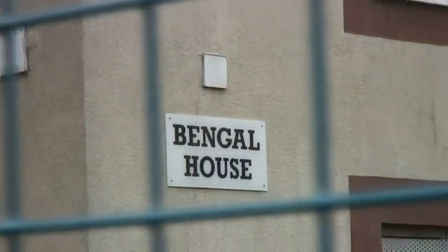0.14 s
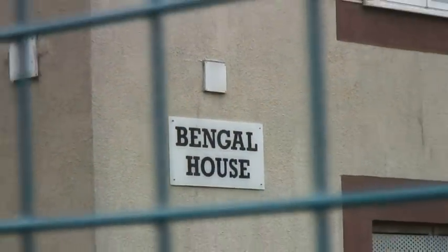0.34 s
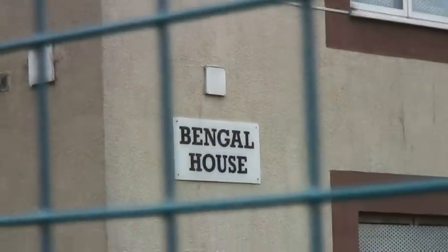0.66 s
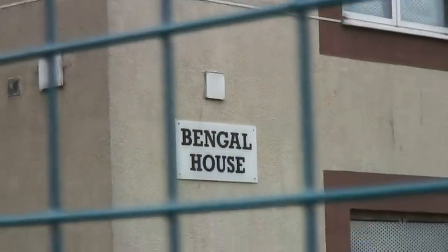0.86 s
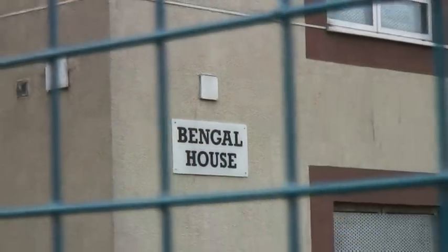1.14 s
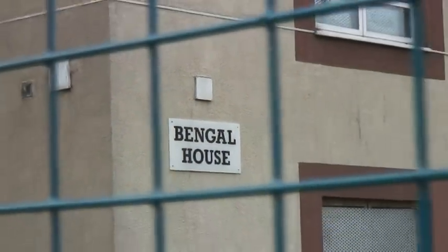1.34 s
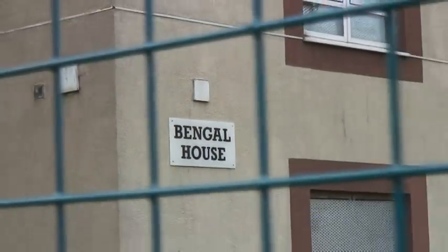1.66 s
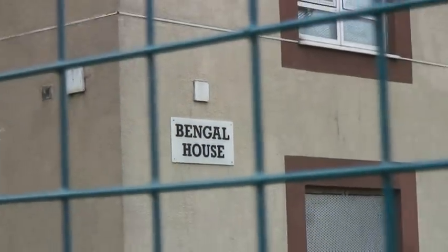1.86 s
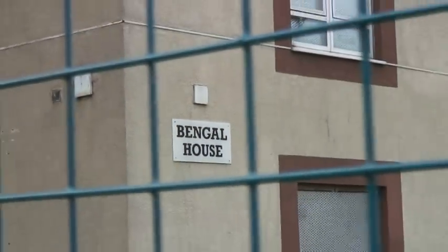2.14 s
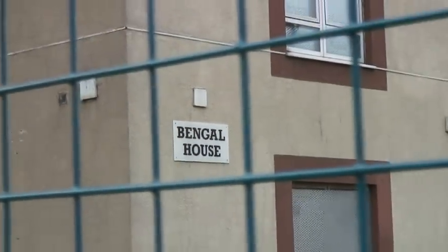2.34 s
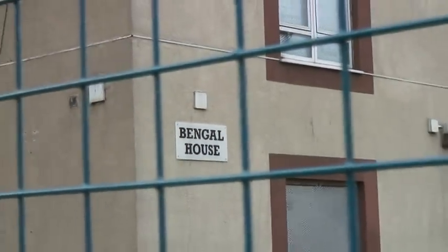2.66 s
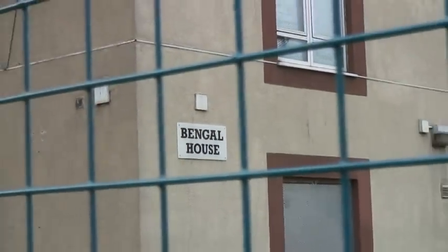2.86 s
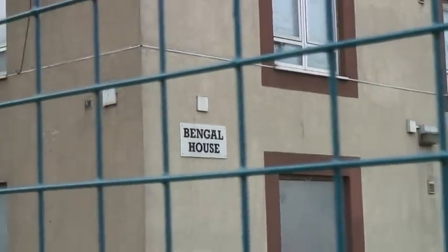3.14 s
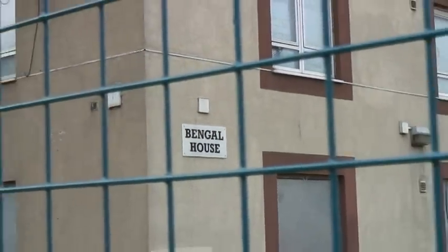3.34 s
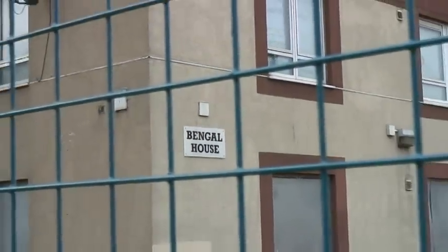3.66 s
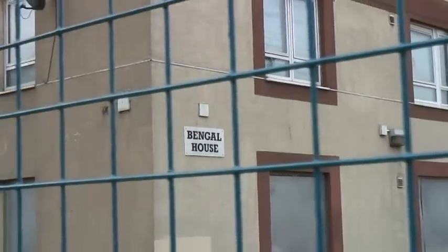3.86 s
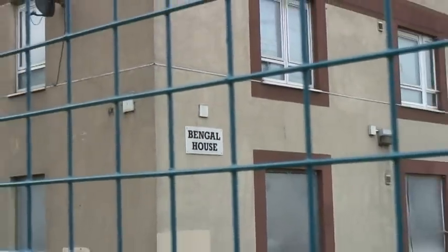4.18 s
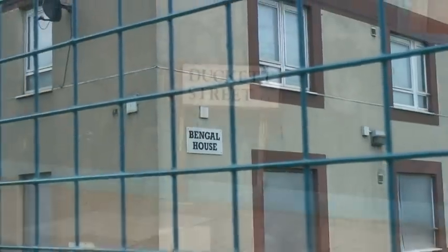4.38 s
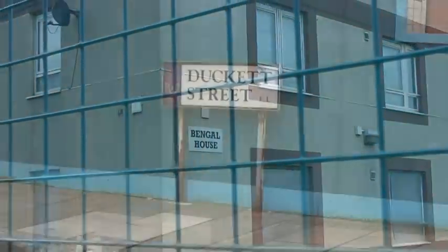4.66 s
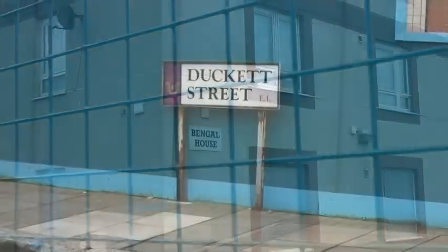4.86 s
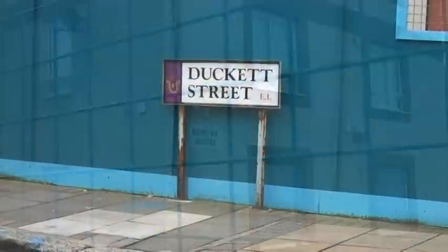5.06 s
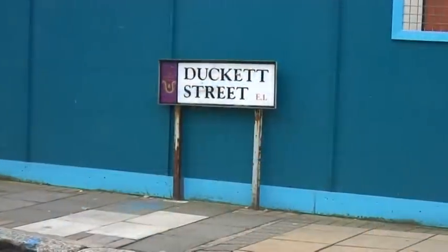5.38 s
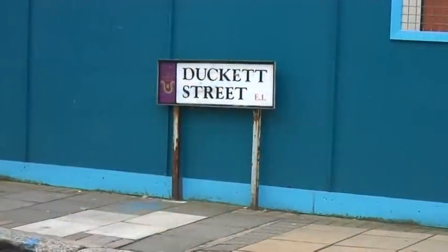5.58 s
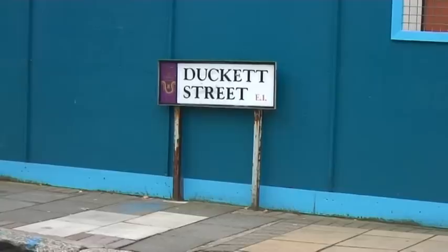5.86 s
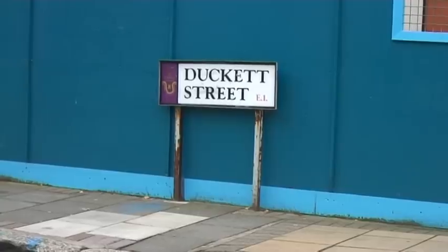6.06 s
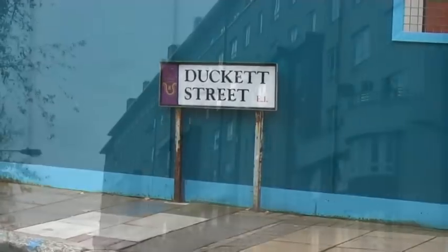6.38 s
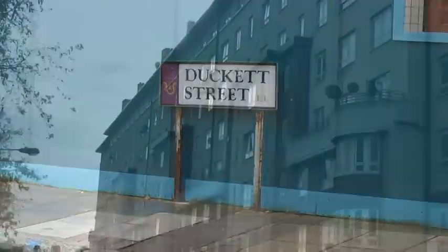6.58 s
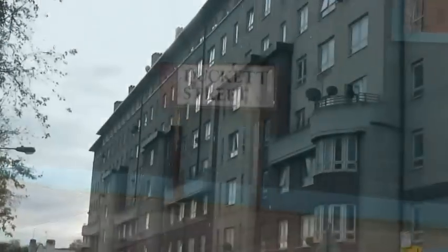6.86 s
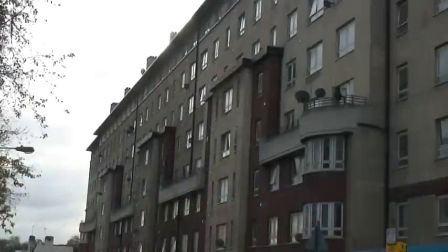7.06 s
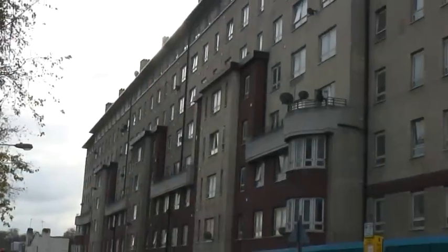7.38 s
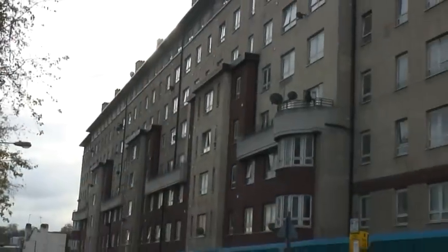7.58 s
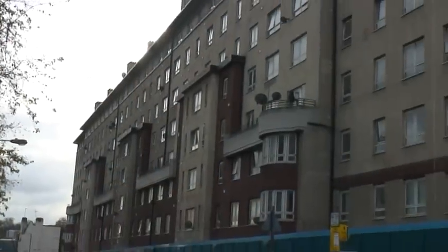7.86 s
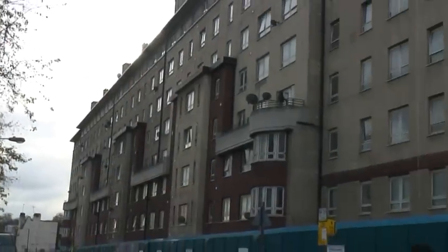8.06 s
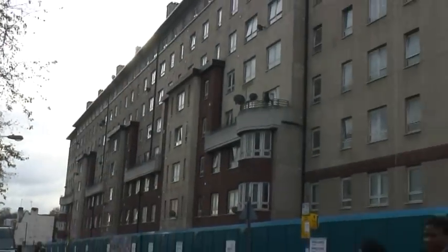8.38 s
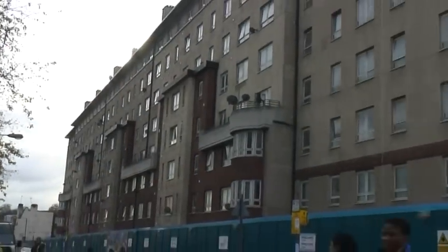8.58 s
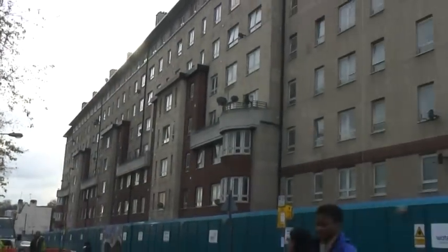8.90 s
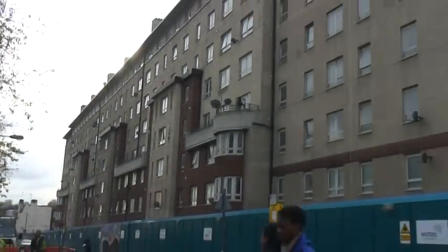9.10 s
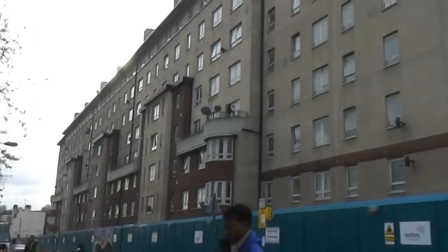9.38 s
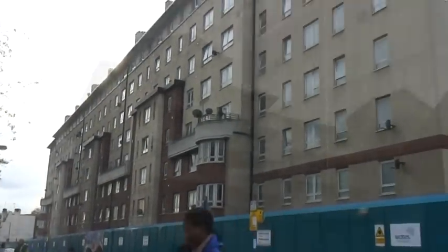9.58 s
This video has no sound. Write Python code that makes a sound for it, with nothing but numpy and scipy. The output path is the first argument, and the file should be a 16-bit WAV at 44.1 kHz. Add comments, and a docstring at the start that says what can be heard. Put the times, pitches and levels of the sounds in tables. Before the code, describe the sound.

From the start, a pneumatic breaker hammers concrete at about twenty blows a second, loud and bright, each blow mixing a low exhaust puff, dry clatter, tiny chip pings and a brief steel chisel ring. Around 1.4-1.6 s the rhythm drags slightly, then recovers. From about 2.4 s the blows weaken into hollow knocks with a rough metallic ring, ending near 2.8 s. A low diesel drone, town rumble and faint hiss remain, with two very faint taps near 3.4 s. Hammering returns at 3.6 s, a little slower. Around 4.6 s it crossfades to a softer, more echoing position, steady until about 6.7 s. A third position fades in, slower at roughly sixteen blows a second, stopping at 7.3 s. After nearly a second of drone, it restarts at 8.2 s and continues to the cut at about 9.7 s. House fronts echo throughout; the sound is distant and almost mono.

```python
"""A demolition site: a pneumatic breaker hammers in bursts, heard from three spots in the street in turn,
one fading into the next. Each blow puffs exhaust air (a short tone), clatters (shaped noise), throws chips
(pings) and rings the steel chisel (dying sines); some blows land in empty air and knock the tool holder.
House fronts echo it all. Behind it a diesel compressor drones (wavering sines) over town rumble and far air
hiss (filtered noise). The microphone is nearly mono."""
import sys
import numpy as np
from scipy import signal
from scipy.fft import rfft, irfft, next_fast_len
from scipy.io import wavfile
from scipy.ndimage import uniform_filter1d, map_coordinates

SR = 44100
rng = np.random.default_rng(int(sys.argv[2]) if len(sys.argv) > 2 else 0)


def bounce(signal):
    """Save signal as a 16-bit WAV file at the path given by the first command-line argument."""
    frames = np.transpose(np.atleast_2d(signal))
    limited = np.clip(frames, -1, 1)
    pcm = np.round(limited * 32767).astype(np.int16)
    wavfile.write(sys.argv[1], SR, pcm)


N = 429534
LEAD = 256  # samples of room ahead of each blow


def amp(db):
    """Turn decibels into a plain factor."""
    return 10 ** (np.asarray(db) / 20)


def unit(x):
    """Scale each row to an RMS of 1."""
    return x / np.sqrt(np.mean(x ** 2, axis=-1, keepdims=True) + 1e-20)


def along(points, hz):
    """Read a curve of (f/Hz, value) points on a log frequency axis."""
    f, v = np.transpose(points)
    return np.interp(np.log(hz + 1), np.log(f + 1), v)


def wobble(rate):
    """A smooth random curve over the whole scene, rate knots a second."""
    knots = rng.standard_normal(int(N * rate / SR) + 4)
    return map_coordinates(knots, [np.arange(N) * rate / SR])


def jolts(count, t, rate):
    """One smooth random curve per blow, rate knots per unit of t (seconds, or Hz for a spectrum)."""
    knots = rng.standard_normal((count, int(t[-1] * rate) + 2))
    k, part = np.divmod(t * rate, 1)
    k = k.astype(int)
    ease = (1 - np.cos(np.pi * part)) / 2
    return knots[:, k] * (1 - ease) + knots[:, k + 1] * ease


def filtered(x, response):
    """Multiply the spectrum of x by a response of frequency, which may be complex."""
    n = x.shape[-1]
    m = next_fast_len(n + 8192)
    return irfft(rfft(x, m) * response(np.fft.rfftfreq(m, 1 / SR)), m)[..., :n]


def laid(rows, at):
    """Add rows of sound at their sample positions, taking off the lead."""
    return np.bincount(at.ravel(), rows.ravel(), N + SR)[LEAD:N + LEAD]


def breaker():
    """The blows reach each spot by a few wall paths, each with its own delay and dulling, and a diffuse tail."""
    # blows, one list per listening spot; levels before fixed trims: t/s, exhaust level/dB, clatter level/dB,
    # ring of the two lowest chisel groups over the clatter/dB, second group over the first/dB,
    # extra ring of the high groups/dB
    blow_lists = [
        [(0.0147, -18.5, -26, 13.5, -1, 4), (0.0661, -14.5, -26, 17.5, 5, 7.5),
         (0.1177, -16.5, -25, 3, -11, -1), (0.168, -15.5, -24, 8, -1, 6), (0.219, -19.5, -24, 3, 11, -3),
         (0.27, -15.5, -27, 9, -6, 10.5), (0.3198, -32, -22, -5, 10, -1.0),
         (0.3703, -14.5, -26.5, 16.5, 4, 13.5), (0.4226, -15.5, -25.5, 5.0, -3, 5),
         (0.4751, -15, -25.5, 7, 7.0, 4.0), (0.5262, -15.5, -23.5, 7.5, 1.0, 6.0),
         (0.5764, -15, -28, 13, -3, 12.5), (0.6259, -15, -25.0, 2, 0.0, 6.5), (0.676, -18, -24, 6, 0.0, 8),
         (0.7255, -17, -26.0, 6.5, -12, 0), (0.7757, -14.5, -24.5, 4.5, 9, 4.0),
         (0.8254, -14.5, -25, 0, -14, -2), (0.8758, -14.0, -28.5, 3, -8, 3), (0.9271, -14.5, -25.5, 3, -4, 3),
         (0.9784, -14.5, -27.5, 5.5, 3.0, 5), (1.029, -16, -25.5, 2, 0.0, -4.0),
         (1.0809, -15.5, -26.5, 0, -5.0, 4), (1.132, -13.5, -26, 7, 10, -4.0),
         (1.1817, -15.5, -23.5, 1, -11, -11.0), (1.2322, -13, -27, 3, -8, -8), (1.2819, -14, -24, 3, -13, 1),
         (1.3332, -14, -25.0, 7.0, -7, 0), (1.3884, -14.5, -27.5, 10, 0, 4),
         (1.4489, -17.5, -27.5, -2.0, -10, -18), (1.5127, -17.5, -28.5, -6, -9, -15),
         (1.577, -18, -29, 4, -13, -6), (1.6328, -15, -26, 6.0, -5, 4), (1.6835, -13.5, -25.5, 1, 13, -2.0),
         (1.7339, -13, -26, 1, 10, 3.5), (1.7841, -15, -24, 5, 8.0, 4), (1.8353, -13.0, -24, -2, 13.0, -3),
         (1.8844, -16, -27, 8.5, -10, 3), (1.9348, -13.5, -24.5, 13.5, 0, -1),
         (1.9849, -13, -25.5, 10.5, -8, 3), (2.0358, -14.5, -25, 5, 17, -3), (2.085, -25, -26, -1, 6, 3),
         (2.1373, -15, -25.5, 8.5, -2, 9), (2.189, -28.5, -23.5, 7, 0, -4), (2.2414, -21, -27.5, 11.5, 2, -8),
         (2.2932, -17, -27.5, 6, 3, -4.0), (2.3448, -21, -27.5, 9, 14, 2.5), (2.398, -21, -35, 3, 0.0, 4),
         (2.45, -23, -32.5, -8, 4.0, -3), (2.503, -21, -33, -2, 10.0, -5), (2.5527, -25, -33, -3, 9, -2),
         (2.6064, -24, -32, -3, 2.0, 2), (2.66, -35, -34, 6, -3, 8), (2.759, -43, -54, 3, 1, 0.0),
         (2.814, -45, -48.5, -6, 0, -3), (3.36, -33, -60, 10, -25, -3), (3.413, -33, -59, 9, -24, -2),
         (3.635, -27, -30, 5, -7, -2), (3.6901, -17, -28.5, 8.5, 6, -2.0), (3.7425, -20.5, -28.5, 5, 3, -4),
         (3.7933, -15.5, -29, -2, -5, -2), (3.8446, -14.5, -26, 16.0, -1.5, -0.0),
         (3.8978, -13.5, -24.5, 4, -2, 2), (3.9516, -14, -24.5, 6, 13, 2.5), (4.0053, -14.5, -26.5, 18, 2, 2.0),
         (4.0583, -15, -26, 4, 2, 1.0), (4.1126, -15, -26.5, 11, 2.0, 0), (4.1697, -14.5, -28, 10.5, -6, -0.0),
         (4.2233, -16.5, -26, 6, 0.0, 3), (4.277, -14, -27.5, 4.0, -2, 1.0),
         (4.3306, -14.5, -22.5, 5.5, -5, -8), (4.3864, -18, -28, 9, 2, 7.5), (4.4418, -18, -27.5, 8.5, 5.0, 0),
         (4.4974, -19.5, -27.5, 4, -2, -4.0), (4.5531, -20, -26.5, 7, 3, 2.5),
         (4.6101, -19, -27.5, 10, -1, -1.0), (4.6696, -23, -30, 5.0, 5.0, -3)],
        [(4.661, -32, -36, -4, 4, -6), (4.7121, -22, -31, -1.0, 13, -5), (4.7625, -28, -28, 7.5, 0.5, -5),
         (4.8142, -24.0, -30.5, 3, 1, -2), (4.8641, -19.5, -30, 7, 4, 4), (4.9144, -26, -26, 1, -1, 5),
         (4.9661, -21.0, -29.0, 11, -5, -1), (5.016, -21.5, -28, 4, 11, -5), (5.0664, -23, -26.0, 1, -1, 3),
         (5.1172, -21.5, -26, -3, 11, 1), (5.1682, -21, -27, 6, -5, 3.0), (5.2186, -19.5, -24, 8.5, 3, 1),
         (5.2691, -19.5, -25.5, 2.5, -11, -2), (5.3202, -19.5, -24, 6.5, -3, 3),
         (5.3708, -18.5, -25, 11.5, 2, 5), (5.4213, -19, -25, 8, 2.5, -3), (5.4722, -21, -25.5, 5.0, -5, -3),
         (5.5231, -18.5, -26, 7, -4.0, -13), (5.5741, -22, -25, 8.5, -1, 5), (5.6248, -21, -27.5, 10.5, 2, 2),
         (5.6751, -21, -27.5, 12.5, 8.5, 1), (5.7261, -22.5, -25.5, 7.0, -14, -3),
         (5.776, -20, -26.5, 13, 6.5, 7), (5.8266, -22.5, -25, 8.0, 3, 1),
         (5.8767, -20.5, -26.5, 8.5, 12.0, -2), (5.9273, -20, -24.5, 8.0, -2, -2.0),
         (5.9786, -18.5, -25, 14, 1, 4.0), (6.0293, -19.5, -26, 9, 10, 1), (6.0802, -18.0, -28, 15.5, 7, 8),
         (6.1306, -20.5, -25, 5, -3.0, 3), (6.1814, -20.0, -27.5, 12.5, 6, 4.0), (6.232, -22, -25, 10, 0, 6.0),
         (6.2827, -22.5, -26.0, 8, 7.0, -1), (6.3331, -22.0, -28, 8.5, 17, 1), (6.3835, -21, -26.0, 1, 9, -5),
         (6.4349, -24, -30.5, 8.0, 12, -0.0), (6.4851, -24.5, -29.0, 7, 5, -1.0),
         (6.5356, -24, -30.5, 10.5, 4, -1.0), (6.5854, -25.0, -29.5, 0.5, 9, 1), (6.6363, -32, -30, 6.5, 9, 3),
         (6.6866, -25.0, -32, 4.0, 8, -2.0), (6.7379, -28, -34, 9, 5.0, -4), (6.791, -32, -40, 14, 2, 6.0)],
        [(6.698, -33, -29.5, -1.0, 7.0, -1), (6.7601, -28, -27, 4.5, 12, 1.0),
         (6.8179, -25.5, -28.5, 5, 3.0, -4.0), (6.8732, -27, -25.0, -1, -5.0, 0),
         (6.9307, -24, -27.5, -4, -2.0, -7), (6.9852, -23, -26, -1.0, -4.0, 3),
         (7.0459, -20, -26.5, 0, -3.0, -6), (7.1015, -23, -23.0, 9.5, -3, 0), (7.1628, -20, -26, 7, -12, 3.0),
         (7.2271, -18.5, -25, -4, -2.0, -11), (7.3049, -27, -28.5, -11, -2.0, -9),
         (8.2361, -23, -27.5, 4, -11, -6), (8.302, -18.5, -27, 12, -12, 1), (8.3584, -21.5, -27.5, 12, 0, 5.5),
         (8.4243, -21, -28.0, 10, -19, -5), (8.4954, -21, -27.5, -2.0, 8, -3),
         (8.5586, -20.0, -26.5, 5, -13, -4.0), (8.6146, -18, -28, -3, 4, 4), (8.6764, -18.5, -27.5, 4, -6.0, 9),
         (8.7393, -20.5, -27, 6, 0, -1.0), (8.8004, -18.5, -27.5, 15, -2.0, 10),
         (8.8617, -19.5, -28.5, -3.0, -1.0, 3), (8.9206, -20, -28.5, 12, -6, 6), (8.9814, -22, -26, 6, -1, -2),
         (9.0433, -19.5, -27.5, -10, -2.0, 3), (9.1007, -17, -26, 2, -5, -1), (9.1648, -23, -27, 6, -17, -1),
         (9.2235, -18, -27.0, 0.0, -1, 5.0), (9.2873, -16.5, -29, 10, -6.0, 3),
         (9.344, -20, -24.5, -5, -9.0, -1), (9.4066, -21, -28.5, 0, -1, 4), (9.4628, -19, -25.0, 12, -3, 4),
         (9.5259, -20, -26.5, 7, -7, 2.0), (9.5832, -19.5, -27.5, 10, 1, 6), (9.6461, -21, -26.5, 1.0, 12, -3),
         (9.705, -22.0, -27.0, 17, -3, 10)],
    ]
    # exhaust puff at each spot: f/Hz, lag/s, length/s, phase/turns
    puffs = [(328, 0.0043, 0.0019, 0.016), (401, 0.002, 0.0019, 0.51), (376, 0.00081, 0.0013, 0.58)]
    # sound paths to each spot, and last to the first spot once the tool has moved:
    # delay/s, level/dB, dulled above f/Hz
    path_sets = [
        [(.0001, 0.3, 16700), (.007, -11, 9500), (.0215, -17.5, 6200)],
        [(.0001, 5, 3240), (.0124, 0.5, 13600), (.021, -5.5, 11800), (.034, -32, 5000)],
        [(.0001, 2.5, 15000), (.0145, 2.5, 8460), (.021, -29, 8350)],
        [(.0001, 0.9, 5400), (.0072, -6.5, 15700), (.016, -13, 12100), (.0215, -15.5, 6150)],
    ]
    # level/dB of the scattered echo for each set of paths
    tail_levels = [-9.5, -4, -5, -7.5]
    # what walls and fences let through to each spot: f/Hz, level/dB
    views = [
        [(90, -9), (200, -0.5), (278, 4), (350, 0), (430, -0.6), (600, -2.5), (930, 0.5), (1600, 0), (3500, -5),
         (9000, 3.5), (14000, -0.5)],
        [(60, -35), (115, -4), (170, -7), (255, 4.5), (400, -7.5), (600, 1.5), (770, 0), (1000, -2),
         (2200, -2.7), (3500, -0.56), (9000, 3.5), (14000, 2)],
        [(60, -33), (110, 4), (160, -31), (300, -1.5), (480, -1.5), (850, -1), (1500, -4), (2400, -5.5),
         (3700, -1), (5500, 0), (9700, 1.5), (14000, 1)],
    ]
    # a row for each spot, the moved tool and the empty blows: chips, then the five upper ring groups,
    # all as level/dB over the clatter, before trims
    balances = [(0, -12, -8.5, -15.5, -22.5, -5), (-8, -1.5, -1.5, -15.5, -31, -12),
                (0.5, 0, -6.5, -20, -15.5, -14.5), (-19, 2.5, 1, -9.5, -14.5, -1),
                (-4, 4, -1, -15, -13, -6)]
    # in the same order: a chisel wedged deep lifts the main note of its lowest group by f/Hz
    seat_shifts = [0, 0, 170, 0, 0]
    # first and last t/s of the time when the chisel is lifted and the piston knocks the tool holder
    empty_span = (2.38, 2.9)
    move_s = 3.5  # in the first pause the tool moves partly behind a corner
    sway_s = .0002  # the tool shifts, so each path is a little longer or shorter at every blow

    first = np.array(blow_lists[0])
    moved = first[:, 0] > move_s
    empty = (first[:, 0] > empty_span[0]) & (first[:, 0] < empty_span[1])
    knocks = holder(first[empty])
    out = knocks + amp(-9.5) * signal.fftconvolve(knocks, scatter())[:N]
    stages = [(first[~moved & ~empty], 0), (blow_lists[1], 1), (blow_lists[2], 2),
              (first[moved], 0), (first[empty], 0)]
    settings = zip(stages, path_sets + path_sets[:1], tail_levels + tail_levels[:1], balances, seat_shifts)
    for (table, spot), paths, tail_db, balance, seat_hz in settings:
        rows = blows(table, puffs[spot], balance, seat_hz)
        rows = filtered(rows, lambda f: amp(along(views[spot], f)))
        sway = sway_s * rng.standard_normal((len(table), len(paths)))

        def walls(f):
            total = 0
            for (delay, db, dull_hz), shift in zip(paths, sway.T):
                late = np.exp(-2j * np.pi * f * (delay + shift[:, None]))
                dulling = (1 + np.sqrt(2) * 1j * f / dull_hz - (f / dull_hz) ** 2) ** 2
                total = total + amp(db) * late / dulling
            return total

        starts = np.round(np.transpose(table)[0] * SR).astype(int)
        at = starts[:, None] + np.arange(rows.shape[1])
        out += laid(filtered(rows, walls), at)
        # moving air keeps the echo of one blow unlike the next: three tails take turns
        for k in range(3):
            out += amp(tail_db) * signal.fftconvolve(laid(rows[k::3], at[k::3]), scatter())[:N]
    return out


def blows(table, puff, balance, seat_hz):
    """One row of sound per blow, before the street shapes it: puff, clatter, chips and ring added up."""
    t = (np.arange(SR // 12) - LEAD) / SR
    u = np.clip(t, 0, None)  # time since the blow
    count = len(table)
    exhaust_db, clatter_db, chips_db, *ring_db = strengths(table, balance)
    sound = amp(exhaust_db + 8.5) * exhaust(t, puff)
    sound = sound + amp(clatter_db + 13) * clatter(count, u)
    sound += amp(chips_db + 3.5) * chips(count, t, size=7)
    sound += chisel_ring(count, u, ring_db, seat_hz)
    return sound * np.clip((t[-1] - t) / .03, 0, 1)  # fade out the end of each row


def strengths(table, balance):
    """All levels of each blow: exhaust, clatter, chips and the seven ring groups."""
    # how chips and the five upper ring groups follow the low ring (row 1) and the high ring (row 2), dB/dB
    follow = [(.4, .3, 0, 0, .1, 0), (0, .3, 1, 1, .3, 1)]
    # scatter of each of these from blow to blow, level/dB
    chance_db = (4, 3.5, 2.5, 3, 4, 2)
    _, exhaust_db, clatter_db, ring_db, lean_db, high_db = np.transpose(table)
    luck = chance_db * rng.standard_normal((len(table), len(balance)))
    followed = np.transpose([ring_db, high_db]) @ follow
    chips_db, *upper_db = (clatter_db[:, None] + balance + followed + luck).T
    low_db = clatter_db + ring_db
    levels = [exhaust_db, clatter_db, chips_db, low_db - lean_db / 2, low_db + lean_db / 2, *upper_db]
    return np.array(levels)[..., None]


def exhaust(t, puff):
    """A puff of exhaust air: a low tone that swells and dies in a few ms."""
    hz, lag, length, turns = puff
    u = t - lag
    return np.cos(2 * np.pi * (hz * u + turns)) * np.exp(-(u / length) ** 2)


def clatter(count, u):
    """The piston cracks on the shank, then loose parts rattle in lumps: noise with a fast and a slow decay."""
    # clatter spectrum: f/Hz, relative level/dB
    colour = [(150, -4), (500, 2), (1000, -2), (1900, -1), (2800, 5.5), (3500, -1), (4500, 2), (5600, -7),
              (7200, -16.5), (11000, -16), (15000, -34)]
    lumps = amp(1.73 * jolts(count, u, 317)) * rng.standard_normal((count, len(u)))
    lumps *= (u > 0) * (0.79 * amp(-60 * u / 0.014) + amp(-60 * u / 0.12))
    casing = rng.standard_normal(len(u)) * (u > 0)
    casing *= 1.2 * amp(-60 * u / 0.028) + 0.64 * amp(-60 * u / 0.15)

    # the heavy casing answers alike at every blow, the light parts differ each time
    def alike(f):
        return 1 / (1 + (f / 1200) ** 4)

    rattle = filtered(lumps, lambda f: amp(along(colour, f)) * np.sqrt(1 - alike(f)))
    rattle += filtered(casing, lambda f: amp(along(colour, f)) * np.sqrt(alike(f)))
    return filtered(rattle, lambda f: amp(1.4 * jolts(count, f, .0012)))  # each blow has its own colour


def chips(count, t, size):
    """Short pings of concrete chips and loose steel, thickest just after the blow."""
    when, pitch, weak = rng.random((count, 3, size)).transpose(1, 2, 0)[..., None]
    out = np.zeros((count, len(t)))
    for s, hz, db in zip(.034 * when ** 1.5, 2300 * 2.1 ** pitch, -9 * weak):
        u = np.clip(t - s, 0, None)
        out += amp(db - 60 * u / .02) * np.sin(2 * np.pi * hz * u)
    return out


def chisel_ring(count, u, ring_db, seat_hz):
    """Steel modes swell over a few ms and die; the ring is choked when the tip meets the concrete again."""
    # chisel modes in the seven ring groups (bending; lengthwise at 4.9 and 9.7 kHz):
    # f/Hz, level in the group/dB, time to fall 60 dB/s
    groups = [
        [(2480, -6, .06), (2742, 0, .13), (2950, -5, .06)],
        [(4392, 0, .16)],
        [(4875, 0, .14), (4975, -7, .07)],
        [(6292, 0, .16)],
        [(8440, 0, .14)],
        [(9745, 0, .16), (14265, -18, .15)],
        [(10785, 0, .13), (11610, -17, .14), (12770, -18, .12), (13240, -12, .13)],
    ]
    # phase upset of each ring group/rad; slow bending is shaken most
    roughness = (1.7, 1.1, .9, 1.1, .9, .8, .8)
    wedge_db_per_s = 900  # extra loss of the two lowest groups of a wedged chisel
    choke = 0.029 + 0.0069 * rng.standard_normal((count, 1))
    swell = (1 - np.exp(-u / 0.0023)) * (0.021 + 1 / (1 + np.exp((u - choke) / 0.0037)))
    sound = np.zeros((count, len(u)))
    for db, modes, rough in zip(ring_db, groups, roughness):
        # the shank bounces in its holder, which upsets strength and phase of the ring
        shake = swell * amp(db + 2 + 2.5 * jolts(count, u, 150))
        slip = rough * jolts(count, u, 120)
        for hz, level_db, t60 in modes:
            luck, load, phase = rng.standard_normal((count, 3)).T[..., None]
            # pressure on the tip shifts the note a little
            pitch = hz + seat_hz * (hz == groups[0][1][0]) + 12 * load
            scatter_db = 4 * luck * (level_db < 0)  # only the weaker modes of a group vary
            wedged = (seat_hz > 0) * (hz < groups[2][0][0])
            fall_db = 60 * u / t60 + wedge_db_per_s * u * wedged
            tone = np.sin(2 * np.pi * (pitch * u + phase) + slip)
            sound += shake * amp(scatter_db + level_db - fall_db) * tone
    return sound


def holder(table):
    """The unloaded piston: a hollow knock, and noise that sets off a rough ring of the steel collar."""
    # collar resonances: f/Hz, width/Hz, level/dB
    collar = [(6056, 180, 0.5), (6100, 140, 1.5), (7600, 760, -22)]
    knock, push, t = np.zeros(N), np.zeros(N), np.arange(SR // 10) / SR
    for s, clatter_db in zip(table[:, 0], table[:, 2]):
        start = round(s * SR)
        thud = np.sin(2 * np.pi * 880 * t) * np.exp(-((t - .004) / 0.0024) ** 2)
        knock[start:][:len(t)] += amp(clatter_db + 11) * thud
        push[start:][:len(t)] += amp(clatter_db + 20.5 - 60 * t / 0.16) * rng.standard_normal(len(t))

    def resonances(f):
        return sum(amp(db) * 1j * f * w / (c * c - f * f + 1j * f * w) for c, w, db in collar)

    return knock + filtered(push, resonances)


def scatter():
    """Diffuse street echo of energy 1, noise whose frequencies die at their own speeds."""
    # street echo: f/Hz, time to fall 60 dB/s
    decay = [(150, 0.18), (1000, 0.95), (4000, 0.78), (12000, 0.61)]
    hz, t, z = signal.stft(rng.standard_normal(SR), SR, nperseg=256)
    tail = signal.istft(z * amp(-60 * t / along(decay, hz)[:, None]), SR, nperseg=256)[1]
    return np.pad(tail / np.linalg.norm(tail), (400, 0))  # starts 400 samples late


def compressor():
    """A diesel firing tone with its octave and a wavering pump note, in a patchy low town rumble."""
    # levels before fixed trims: t/s, firing f/Hz, tone level/dB, octave level/dB, pump and rumble level/dB
    drone = [(0, 89.6, -35.5, -62, -24.5), (2.5, 90, -37.5, -43, -28), (3.5, 92.6, -39, -32, -29.5),
             (4.4, 92, -37, -44, -28), (4.8, 90, -43.5, -40, -26), (5.2, 89.5, -37.5, -23, -25.5),
             (5.6, 89.7, -36, -38.5, -23), (6.4, 88.8, -39, -30.5, -27), (6.68, 89.5, -50, -31.5, -25),
             (6.9, 91.7, -40, -33, -23.5), (7.5, 92, -39.5, -33, -27), (8.1, 93.9, -38.5, -31.5, -26.5),
             (8.9, 92.3, -36.5, -30.5, -24), (9.74, 92.4, -39.5, -30.5, -26)]
    # rumble spectrum: f/Hz, relative level/dB
    town = [(40, -19), (70, -19), (110, -16.5), (165, -5), (225, -9.5), (270, -6), (480, -13.5),
            (730, -20.5), (1090, -21.5), (1500, -30.5), (3300, -58)]
    s, *cols = np.transpose(drone)
    hz, tone_db, octave_db, rumble_db = [np.interp(np.arange(N) / SR, s, c) for c in cols]
    phase = 2 * np.pi * np.cumsum(hz) / SR
    firing = amp(tone_db + 2.0 + 0.55 * wobble(14)) * np.sin(phase)
    octave = amp(octave_db + 1.5 + 0.85 * wobble(12)) * np.sin(2 * phase + 0.15 * wobble(6.7))
    pump = amp(rumble_db - 9.5 + 5.1 * wobble(10)) * np.sin(2.43 * phase + 1.24 * wobble(13))
    # a smoothed random field over time and frequency makes the rumble patchy
    z = signal.stft(rng.standard_normal(N), nperseg=1024)[2]
    field = uniform_filter1d(rng.standard_normal(z.shape), 3, axis=0)
    field = uniform_filter1d(field, 5, axis=1)
    patchy = signal.istft(z * amp(1.37 * field / field.std()), nperseg=1024)[1][:N]
    rumble = unit(filtered(patchy, lambda f: amp(along(town, f))))
    return firing + octave + pump + amp(rumble_db - 3.4) * rumble


def hiss():
    """Far air hiss of the site: coloured noise whose level drifts."""
    # hiss spectrum: f/Hz, relative level/dB
    colour = [(710, -24), (1200, -19), (1400, -8), (1680, -9.5), (2910, -10), (3440, -14), (4900, -14.5),
              (6840, -24.5), (7760, -20.5), (8610, -28.5), (11300, -30), (13500, -50), (14500, -74.5)]
    # hiss loudness: t/s, level/dB
    loudness = [(0, -33.5), (4.4, -57.5), (6.9, -42.5), (9.74, -51)]
    noise = unit(filtered(rng.standard_normal(N), lambda f: amp(along(colour, f))))
    return amp(np.interp(np.arange(N) / SR, *np.transpose(loudness))) * noise


def scene():
    """Everything arrives from afar, so both channels hear the same."""
    return np.tile(breaker() + compressor() + hiss(), (2, 1))


def record(dry):
    """The channels differ faintly, the bass is cut, light wind thumps below it; soft clipping, band limit."""
    # left-right difference: f/Hz, level/dB
    side_level = [(60, -21), (110, -39.5), (200, -73), (370, -48), (690, -37), (1270, -52), (2330, -30),
                  (4290, -27), (7900, -29.5), (14500, -40)]
    top_hz = 15130
    hz, _, z = signal.stft(dry[0], SR, nperseg=512)
    turn = np.exp(2j * np.pi * rng.random(z.shape))  # random phases
    side = signal.istft(z * turn * amp(along(side_level, hz))[:, None], SR, nperseg=512)[1][:N]
    pair = filtered(dry + np.array([side, -side]), lambda f: 1 / (1 + (74 / (f + 1)) ** 14))
    air = rng.standard_normal((3, N))  # one shared wind noise, then one for each channel
    thumps = unit(filtered(air[0] + 0.51 * air[1:], lambda f: f / (f + 15) / (1 + (f / 60) ** 4)))
    pair = pair + amp(-61.0 + 3 * wobble(1.6) + 2.5 * wobble(6.4)) * thumps
    pair = pair / (1 + np.abs(pair) ** 8) ** (1 / 8)
    return filtered(pair, lambda f: f < top_hz)


dry = scene()
out = record(dry)
bounce(out)
```